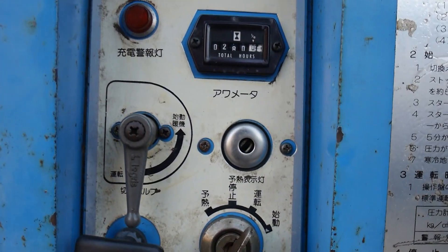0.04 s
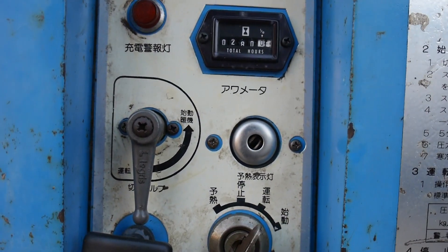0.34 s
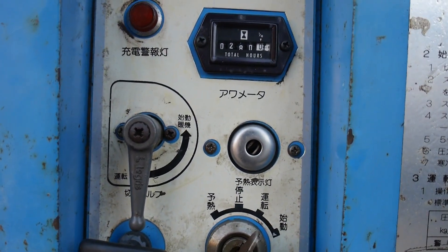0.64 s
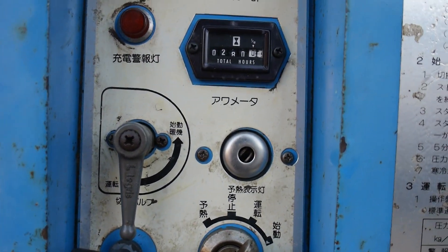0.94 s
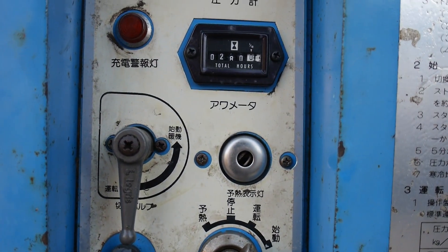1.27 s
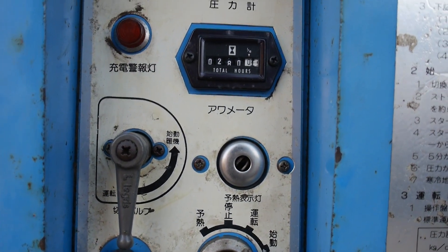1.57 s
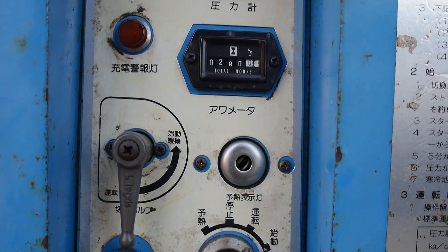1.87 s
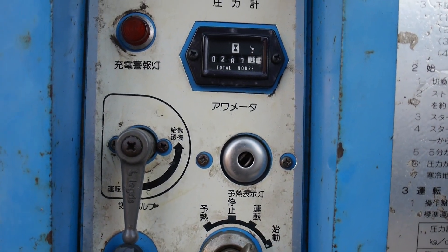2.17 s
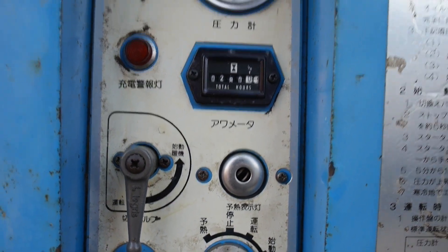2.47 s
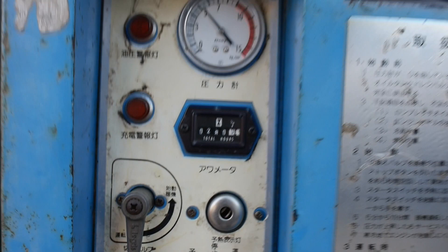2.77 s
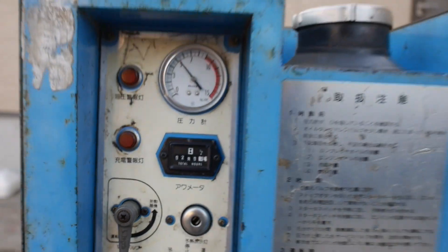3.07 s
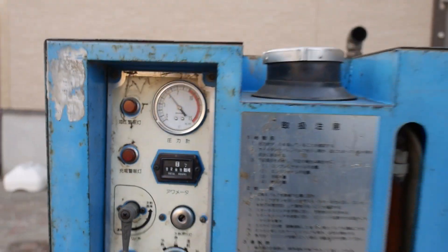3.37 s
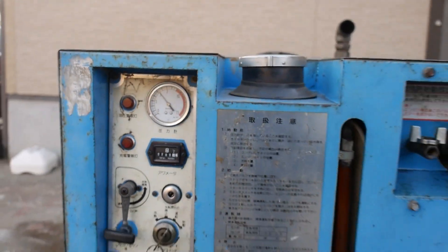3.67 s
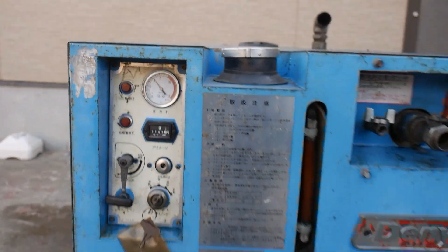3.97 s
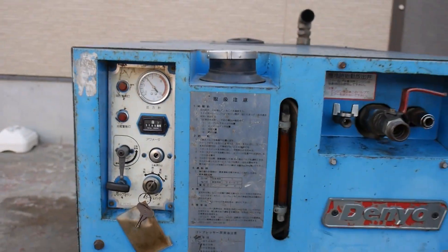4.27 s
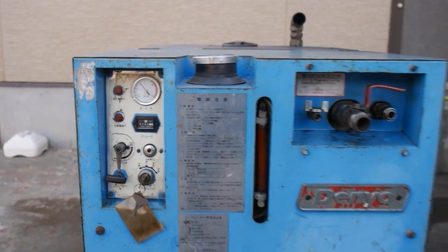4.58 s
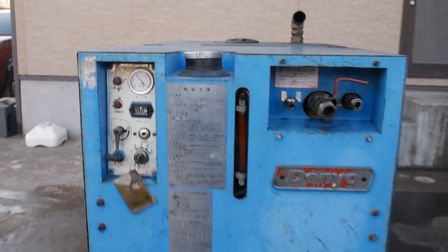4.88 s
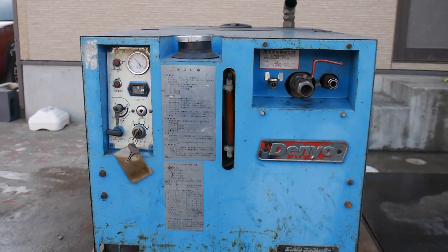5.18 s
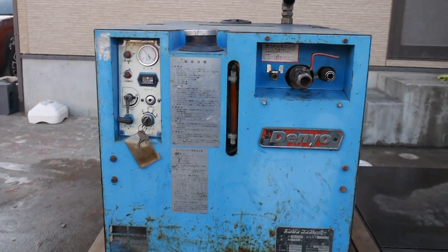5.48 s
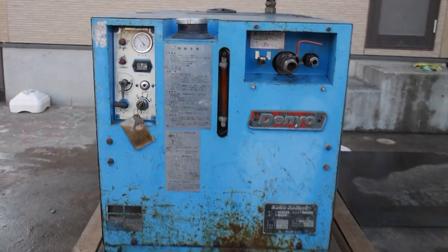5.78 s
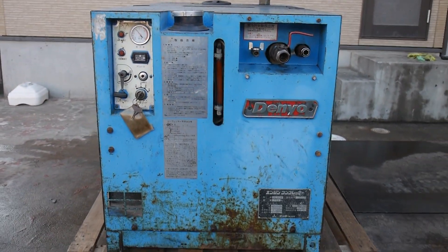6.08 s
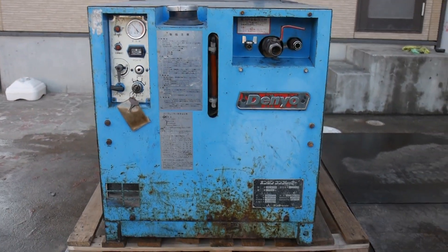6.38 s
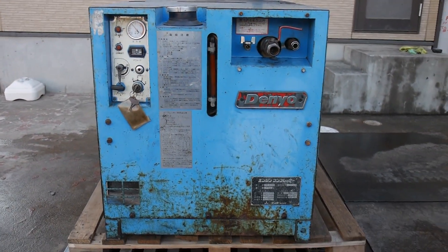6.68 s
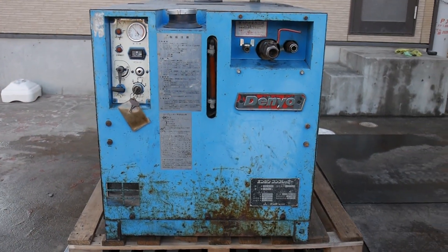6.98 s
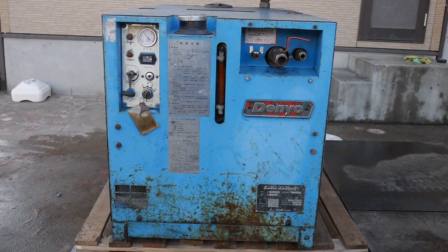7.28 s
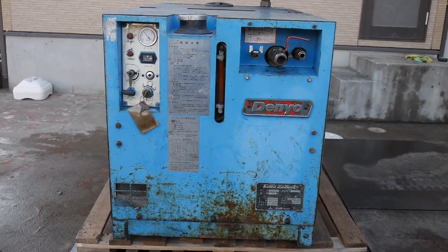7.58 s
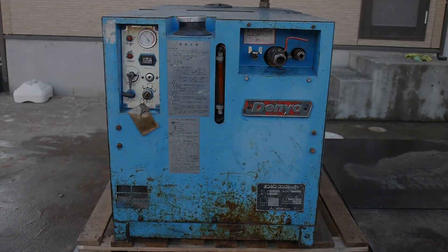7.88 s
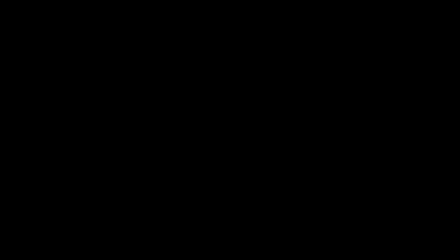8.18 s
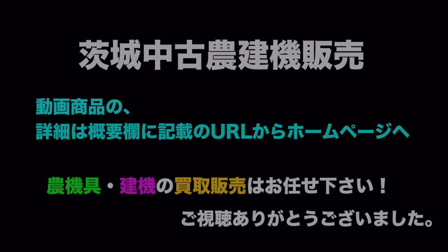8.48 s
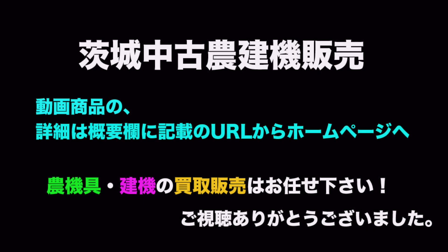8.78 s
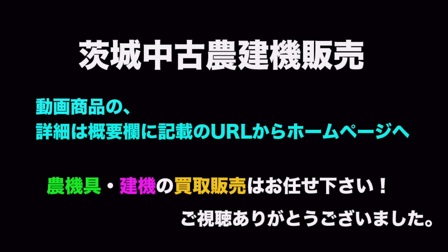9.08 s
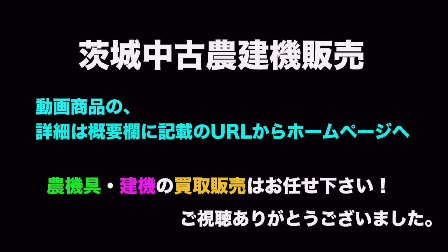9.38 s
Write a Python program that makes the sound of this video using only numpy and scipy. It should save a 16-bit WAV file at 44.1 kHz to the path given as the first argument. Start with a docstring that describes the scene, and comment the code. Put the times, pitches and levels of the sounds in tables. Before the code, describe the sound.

A diesel air compressor idles loudly in an open yard, its steady low drone layered with engine knock, a whine, fast valve clatter and rattling panels. The microphone starts close to the machine, then backs away about a metre and a half, so the tone shifts and a low boom swells. Near the end everything fades smoothly to silence.

```python
"""Diesel air compressor in a yard

A three-cylinder engine idles: exhaust and housing drone on the orders (multiples) of its working cycle,
the block knocks, valves and injectors clatter, loose panels rattle. The hand-held microphone sways at the
control panel, then backs off to about 1.6 m: the colour changes, a boom swells, and the sound fades out."""
import sys
import numpy as np
from scipy.fft import rfft, irfft, next_fast_len
from scipy.io import wavfile
from scipy.ndimage import map_coordinates

SR = 44100
rng = np.random.default_rng(int(sys.argv[2]) if len(sys.argv) > 2 else 0)


def pcm_store(signal):
    """Save signal as 16-bit PCM."""
    levels = np.round(np.clip(np.atleast_2d(signal), -1, 1) * 32767)
    wavfile.write(sys.argv[1], SR, levels.astype(np.int16).T)


N = 420713
TIME = np.arange(N) / SR
AGE = np.arange(SR // 40) / SR  # the life of one blow [s]
CYCLE_HZ = 17.167  # working cycles a second, three firings each
CYCLES = int(N / SR * CYCLE_HZ)
YARD_M = 1.226  # from this distance on, the microphone hears the colour of the open yard
MAIN_ORDERS = (12, 24, 36, 56, 104)  # three booms, rotor whine, drive whine

# microphone path, back from its closest point to the panel: (time [s], distance [m])
MIC_PATH = [(0, 0.18), (.4, 0.31), (1.15, 0.0063), (1.8, 0.23), (2.3, 0.11), (2.8, 0.31), (3.7, 0.77),
            (4.6, 1.1), (5.6, 1.28), (6.5, 1.46), (7.8, 1.57)]
# the microphone's two ports: (frequency [Hz], left minus right [dB], left lead [rad])
MIC_PORTS = [(60, 0, 0), (1700, 0, 0), (2600, -.1, -.03), (3500, -3, -.35), (6700, -2.2, -.25),
             (9300, -1.2, -1.2), (12000, -2, -1.7)]
# the main orders swell and sink on the way through the yard's standing waves: (time [s], level [dB])
BOOM = [(0.0, -37), (0.4, -32.5), (0.8, -34), (1.1, -31.5), (2.3, -35.5), (2.55, -40), (3.25, -39.5),
        (3.8, -32), (4.9, -28), (7.75, -29.5)]
BOOM_OCTAVE = [(0.0, -35.5), (0.55, -34), (0.9, -52), (1.05, -52.5), (1.45, -40), (1.85, -35.5),
               (2.1, -45.5), (2.35, -34.7), (2.85, -46), (3.35, -43), (3.7, -49.5), (3.95, -41.1),
               (4.5, -36), (5.2, -37), (5.45, -47), (6.1, -39.5), (7.75, -40)]
BOOM_TWELFTH = [(0.0, -30), (0.45, -43), (1.2, -31), (1.7, -37), (4.0, -34), (4.35, -40.5), (5.0, -39.0),
                (5.45, -48), (6.5, -35.5), (7.2, -45), (7.75, -41.5)]
ROTOR_WHINE = [(0.0, -35), (0.5, -38.5), (0.95, -36.5), (2.5, -35.5), (4.45, -31), (5.05, -37),
               (5.75, -34.5), (6.75, -38), (7.3, -34.5), (7.75, -35)]
DRIVE_WHINE = [(0, -62), (3.8, -54), (4.9, -46), (5.3, -58), (6.1, -47), (7.4, -45.5), (7.9, -44.5)]
# drone at three microphone spots: (order [rounded in use], panel [dB], midway [dB], yard [dB])
DRONE_ORDERS = [(3, -36.5, -36.5, -35.5), (6, -42, -40, -41), (7, -56.5, -47.5, -43), (8, -43.5, -43, -47),
                (9, -36, -36.5, -43.5), (13, -56, -46.5, -51.5), (15, -45, -47, -39),
                (17, -46.5, -50, -44.5), (21, -43, -45.5, -50), (26, -43.5, -44.5, -49.5),
                (30, -48, -41.5, -43.5), (32, -41, -41, -45), (33, -37.5, -42.5, -45.5),
                (39, -41, -40, -59), (42, -50.5, -44, -49), (44, -44, -42, -46), (45, -54, -41, -43),
                (46, -39, -48.5, -54), (48, -44.5, -52.5, -43.5), (52, -48.5, -42.5, -70.5),
                (53, -43, -45.5, -45.5), (57, -61, -41.5, -50), (60, -38.5, -47.5, -52.5),
                (61, -37, -47.5, -54.5), (62, -48.5, -44.5, -47), (89.2, -53, -60, -52.5),
                (91.3, -59.5, -61, -52), (96.2, -46, -61, -72), (99.1, -49.5, -46, -67)]
# a weaker housing overtone and its reflection:
# (order, level at panel [dB], slope [dB/m], first node [m], node spacing [m], reflected share [0-1])
STANDING_WAVES = [(18, -44, 5.5, 1, 2.9, 0.46)]
# relative colour of block and of valve gear: (frequency [Hz], panel [dB], midway [dB], yard [dB])
BLOCK_COLOUR = [(25.2, -77, -79.5, -77), (79.8, -69.5, -66.5, -69), (130, -66, -70.5, -64),
                (215, -60.5, -59, -57.5), (350, -64.5, -70, -62.5), (453, -57.5, -57.5, -62.5),
                (583, -57.5, -56.5, -57), (801, -57.5, -60, -61.5), (950, -63, -61, -57.5),
                (1094, -57.5, -63, -59.5), (1368, -70.5, -67, -68), (1760, -67, -71, -68),
                (2120, -69.5, -69.5, -68.5), (2526, -72, -72, -70.5), (3268, -86.5, -75.5, -74)]
VALVE_COLOUR = [(3140, -73.5, -86, -92.5), (3870, -78.5, -76, -76.5), (4460, -78, -79.5, -83),
                (5200, -77, -80, -80), (6180, -77.5, -83, -85), (6980, -79, -82, -84),
                (8860, -78, -84.5, -82.5), (9690, -76, -82, -77.5), (11260, -87, -95.5, -92.5),
                (12450, -105, -103, -103)]
# mechanical blows: (place in cycle [0-1], relative level [dB], decay before stretching [s])
BLOWS = [(.19, 3, 0.0037), (.255, -3.5, 0.004), (.33, -2.5, 0.0039), (.53, -3, 0.006), (.615, -4.5, 0.0033),
         (.71, -8.5, .003), (.865, 0, 0.0032), (0.96, 2.5, 0.0028)]
# part of the knock that is alike in every cycle: (frequency [Hz], power share [0-1])
KNOCK_REPEAT = [(100, .65), (400, .55), (900, .58), (1500, .38), (3000, .22)]
# left-right likeness of the clatter: (frequency [Hz], correlation [0-1])
CLATTER_LIKENESS = [(2500, .85), (3300, .7), (4500, .72), (6500, .74), (8500, .7), (12500, .5)]
# rockers and springs:
# (place in cycle [0-1], frequency [Hz], half width [Hz], panel [dB], midway [dB], yard [dB])
VALVE_RINGS = [(.12, 6500, 380, -63.5, -56, -63), (.17, 9390, 302, -56.5, -65, -62),
               (.2, 3500, 792, -62, -58, -57.5), (.52, 5810, 801, -57, -60.5, -57.5),
               (.85, 5820, 800, -58.5, -55, -61), (.855, 8880, 1103, -53.5, -55.5, -57)]
# the three injectors: (place in cycle [0-1], relative level [dB])
INJECTIONS = [(.265, 3.5), (.64, 3), (.935, 3.5)]
# fuel line resonances: (frequency [Hz], half width [Hz], panel [dB], midway [dB], yard [dB])
FUEL_LINES = [(6010, 300, -55, -55, -55.5), (6790, 150, -54.5, -60.5, -60.5), (8900, 370, -51, -62.5, -62),
              (9600, 400, -59.5, -60, -58.5)]
# one more of them, flaring twice as the microphone backs away: (time [s], level [dB])
FUEL_SIZZLE = [(0, -61), (3.85, -57.5), (4.15, -51.5), (4.47, -58), (4.75, -53), (5, -57.5)]
# a steel part under the valve blows: (frequency [Hz], relative level [dB], decay [s])
CLINK_MODES = [(2542, -1, .007), (2676, -0.5, .007), (2910, -0.5, 0.0027), (3155, -2.5, 0.0021)]
# the blows that reach it: (place in cycle [0-1], relative level [dB])
CLINK_BLOWS = [(.195, 2), (0.251, -1), (.55, -6.5), (.89, -7)]
# loose panels, from the closest spot: (place in cycle [0-1], frequency [Hz], level [dB])
PANEL_KNOCKS = [(.17, 1835, -48), (.52, 2085, -50.5), (.92, 1750, -49.5)]
# single harder hits on steel: (time [s], frequency [Hz], level [dB])
HARD_TICKS = [(.54, 9000, -30), (.714, 8450, -30), (2.684, 6650, -33), (3.207, 6300, -35),
              (3.212, 8300, -32), (4.207, 8200, -34), (4.79, 8300, -38)]


def boom_and_whine(cycle):
    """The housing booms on three orders; the rotor holds a clean whine, the drive a thinner one."""
    levels = [BOOM, BOOM_OCTAVE, BOOM_TWELFTH, ROTOR_WHINE, DRIVE_WHINE]
    return sum(amp(over_time(level)) * order_tone(order, cycle, waver_db=0.5, slip=.018)
               for order, level in zip(MAIN_ORDERS, levels))


def drone(cycle, shares):
    """Firing pulses and housing panels sound on whole orders of the cycle."""
    return sum((amp(dbs) @ shares) * order_tone(round(order), cycle) for order, *dbs in DRONE_ORDERS)


def block_knock(cycle, shares, metres):
    """Combustion and piston blows shake the block: partly alike in every cycle, partly new."""
    weights = np.array([wobble(0.701) for _ in range(3)])  # the mix of weak orders drifts slowly
    weak_orders = sum(w * block_vibration(cycle) for w in weights) / np.linalg.norm(weights, axis=0)
    same = filtered(weak_orders, lambda hz: np.sqrt(over_hz(KNOCK_REPEAT, hz)))
    noise = np.sqrt(5) * rng.standard_normal(N)  # wider in band than the orders, so driven harder
    fresh = filtered(noise, lambda hz: np.sqrt(1 - over_hz(KNOCK_REPEAT, hz)))
    struck = 0.16 / (1 + metres / YARD_M)  # the yard's echoes smooth the blows
    force = np.sqrt(1 - struck + struck * blow_power(cycle, scatter_db=0.5, attack=.0005, stretch=0.64))
    throb_db = 0.5 * (1 - shares[2]) * np.cos(2 * np.pi * (3 * cycle - 0.044))  # each firing, close up
    level_db = -28 - 2.5 * np.minimum(metres, YARD_M)
    body = amp(level_db) * coloured((same + fresh) * force * amp(throb_db), BLOCK_COLOUR, shares)
    low_mids = filtered(body, lambda hz: bell(hz, 330, 56))
    return body - 0.56 * bell(metres, 1.27, .15) * low_mids  # a hollow spot 1.27 m back


def block_vibration(cycle, size=4096):
    """The block shakes alike in every cycle on the weak orders between the strong ones."""
    spectrum = np.exp(2j * np.pi * rng.random(size // 2 + 1))
    strong = [*MAIN_ORDERS] + [round(row[0]) for row in [*DRONE_ORDERS, *STANDING_WAVES]]
    spectrum[[0, *strong]] = 0
    spectrum[size // 16:] = 0
    return unit(np.interp(cycle % 1 * size, np.arange(size), irfft(spectrum), period=size))


def standing_wave(cycle, metres):
    """A housing overtone meets its own reflection and sinks as the microphone passes a node."""
    out = np.zeros(N)
    for order, db, db_per_m, node, spacing, reflected in STANDING_WAVES:
        phase = 2 * np.pi * (metres - node) / spacing
        pattern = np.sqrt(1 + reflected ** 2 - 2 * reflected * np.cos(phase))
        out += amp(db + db_per_m * metres) * pattern * order_tone(round(order), cycle)
    return out


def valve_clatter(cycle, shares, struck=0.51, grit_db=2):
    """Valves and injectors tick over the hiss of the cooling air, partly different left and right."""
    power = blow_power(cycle, scatter_db=4.0, attack=.0004, stretch=1.7)
    ticks = unit(np.sqrt(power) * amp(grit_db * wobble(600)))
    noise = rng.standard_normal((2, N)) * np.sqrt(1 - struck + struck * ticks ** 2)
    spread = lambda hz: np.arccos(over_hz(CLATTER_LIKENESS, hz)) / 2
    mid, side = filtered(noise, lambda hz: np.array([np.cos(spread(hz)), np.sin(spread(hz))]))
    level = amp([-41, -41.5, -44.5]) @ shares  # panel, midway, yard
    return level * coloured(np.array([mid + side, mid - side]), VALVE_COLOUR, shares)


def valve_rings(cycle, shares):
    """Rockers and springs each chatter briefly in their own resonance when their blow falls."""
    return sum((amp(dbs) @ shares) * struck_part(cycle, place, hz, width)
               for place, hz, width, *dbs in VALVE_RINGS)


def injectors(cycle, shares):
    """Each injection rings all the resonances of the fuel lines."""
    def pipe(hz, width):
        return unit(sum(amp(db) * struck_part(cycle, place, hz, width) for place, db in INJECTIONS))
    sizzle = amp(over_time(FUEL_SIZZLE)) * pipe(hz=8200, width=270)
    return sizzle + sum((amp(dbs) @ shares) * pipe(hz, width) for hz, width, *dbs in FUEL_LINES)


def clink(cycle, metres, attack=0.00034, scatter_db=2, detune=0.007, slip=.13):
    """Valve blows ring a few steel modes, a little different in strength and pitch each time."""
    out = np.zeros(N)
    chance = lambda: rng.standard_normal((CYCLES, 1))
    for place, blow_db in CLINK_BLOWS:
        detuned_age = AGE * (1 + detune * chance())
        ring = 0
        for hz, db, decay in CLINK_MODES:
            envelope = amp(db + scatter_db * chance()) * np.exp(-AGE / decay)
            ring += envelope * sine(hz * detuned_age + rng.random() + slip * chance())
        out += amp(blow_db) * each_cycle(cycle, place, ring * (1 - np.exp(-AGE / attack)), jitter_s=0)
    gap_db = 4.1 * bell(metres, 0.53, 0.18)  # loudest with the microphone in line with a gap
    return amp(-45.5 - 3.5 * metres + gap_db) * unit(out)


def loose_panels(cycle, metres, db_per_m=-2.5):
    """Loose panels give short ringing knocks, now hard, now hardly at all."""
    knocks = sum(amp(db) * struck_part(cycle, place, hz, width=290, scatter_db=5.0)
                 for place, hz, db in PANEL_KNOCKS)
    return amp(db_per_m * metres) * knocks


def hard_ticks():
    """Now and then a steel part is hit harder and stands out."""
    out = np.zeros(N)
    for start, hz, db in HARD_TICKS:
        out[round(start * SR):][:len(AGE)] += amp(db) * chatter(hz, width=250, count=1)[0]
    return out


def crank(drift=0.0006, flutter=0.0009):
    """Working cycles elapsed; the governor holds the speed almost steady."""
    return np.cumsum(CYCLE_HZ * (1 + drift * wobble(1.5) + flutter * wobble(20))) / SR


def order_tone(order, cycle, waver_db=1.15, slip=0.046):
    """One order of the cycle; level and phase waver more with pitch, up to 500 Hz."""
    unsteady = min(order * CYCLE_HZ / 500, 1)
    lag = order ** 2 / 10.4  # silencer and housing delay each order differently, smearing the pulses
    level = amp(unsteady * waver_db * wobble(9))
    return level * sine(order * cycle - lag + unsteady * slip * wobble(12))


def blow_power(cycle, scatter_db, attack, stretch):
    """Power of the blows that recur in each cycle, each time with a new force; mean 1."""
    power = np.zeros(N)
    for place, db, decay in BLOWS:
        force = amp(db + scatter_db * rng.uniform(-1.1, 1, (CYCLES, 1)))
        envelope = (1 - np.exp(-AGE / attack)) * np.exp(-AGE / (decay * stretch))
        power += each_cycle(cycle, place, (force * envelope) ** 2)
    return power / power.mean()


def struck_part(cycle, place, hz, width, scatter_db=3.0):
    """A resonance struck once a cycle, each time with a new force; rms 1."""
    force = amp(scatter_db * rng.uniform(-2.16, 1, (CYCLES, 1)))
    return unit(each_cycle(cycle, place, force * chatter(hz, width, count=CYCLES)))


def chatter(hz, width, count, attack=0.00096, decay=0.006):
    """Short noise bursts (rows) in one steel resonance."""
    resonance = bell(np.fft.rfftfreq(len(AGE), 1 / SR), hz, width)
    noise = unit(irfft(rfft(rng.standard_normal((count, len(AGE)))) * resonance, len(AGE)))
    return noise * (1 - np.exp(-AGE / attack)) * np.exp(-AGE / decay)


def each_cycle(cycle, place, shapes, jitter_s=.0003):
    """Lay one shape (a row) into every cycle at this place, slightly early or late."""
    starts = np.interp(np.arange(CYCLES) + place, cycle, TIME) + jitter_s * rng.standard_normal(CYCLES)
    index = np.abs(starts * SR).astype(int)[:, None] + np.arange(len(AGE))
    return np.bincount(index.ravel(), shapes.ravel(), N)[:N]


def mic_shares(metres):
    """Shares (3 x N) of the sound heard at the panel, midway and in the yard."""
    way_out = np.clip(metres / YARD_M, 0, 1) ** 1.9  # the panel's colour holds at first
    return np.clip(1 - np.abs(2 * way_out - np.arange(3)[:, None]), 0, 1)


def mic_ports(hz):
    """Level and phase at the left and right port, half of the difference on each side."""
    f, db, lead = np.transpose(MIC_PORTS)
    half = np.array([[.5], [-.5]])
    return amp(half * over_hz(np.c_[f, db], hz)) * np.exp(1j * half * over_hz(np.c_[f, lead], hz))


def coloured(x, table, shares):
    """Give x the colour heard at each microphone spot; the band ends steeply at the table's edges."""
    f, *spots = np.transpose(table)
    edges = lambda hz: 1 / np.sqrt((1 + (hz / f[-1]) ** 16) * (1 + (f[0] / (hz + 1)) ** 16))
    return sum(share * unit(filtered(x, lambda hz: edges(hz) * amp(over_hz(np.c_[f, db], hz))))
               for share, db in zip(shares, spots))


def filtered(x, response):
    """x through a response of frequency."""
    size = next_fast_len(N + 8192, True)
    return irfft(rfft(x, size) * response(np.fft.rfftfreq(size, 1 / SR)), size)[..., :N]


def wobble(rate):
    """A smooth random curve, rate knots a second."""
    coarse = TIME[::64]
    knots = rng.standard_normal(int(TIME[-1] * rate) + 4)
    return np.interp(TIME, coarse, map_coordinates(knots, [coarse * rate]))


def over_hz(points, hz):
    """(frequency, value) points read on a log axis."""
    f, values = np.transpose(points)
    return np.interp(np.log(hz + 1), np.log(f + 1), values)


def over_time(points):
    """(time, value) points read at every sample."""
    return np.interp(TIME, *np.transpose(points))


def sine(turns):
    """A sine of rms 1."""
    return np.sqrt(2) * np.sin(2 * np.pi * turns)


def bell(x, centre, half_width):
    """A smooth bump of height 1."""
    return np.exp(-((x - centre) / half_width) ** 2)


def amp(db):
    """Decibels to gain."""
    return 10 ** (np.asarray(db) / 20)


def unit(x):
    """Scale to rms 1."""
    return x / np.sqrt(np.mean(x ** 2) + 1e-20)


def scene():
    """One crankshaft times the machine; the microphone's distance shapes levels and colours."""
    cycle, metres = crank(), over_time(MIC_PATH)
    shares = mic_shares(metres)
    tones = drone(cycle, shares) + standing_wave(cycle, metres) + boom_and_whine(cycle)
    steel = valve_clatter(cycle, shares) + valve_rings(cycle, shares) + injectors(cycle, shares)
    steel += clink(cycle, metres) + hard_ticks()
    steel *= amp(1.4 * bell(TIME, 6.45, 0.6))  # the treble swells slightly, once
    knocks = block_knock(cycle, shares, metres) + loose_panels(cycle, metres)
    return filtered(tones + knocks + steel, mic_ports)


def record(dry):
    """A smooth fade to silence, three narrow notches in the treble, then the band limit."""
    fade_start_s, fade_end_s = 7.705, 8.756
    notches_hz, half_width_hz, top_hz = (3975, 4640, 5540), 22, 14500
    progress = np.clip((TIME - fade_start_s) / (fade_end_s - fade_start_s), 0, 1)
    fade = np.cos(np.pi / 2 * progress) ** 2
    notches = lambda hz: np.prod([(hz - f) / (hz - f - 1j * half_width_hz) for f in notches_hz], axis=0)
    return filtered(dry * fade, lambda hz: notches(hz) * (hz < top_hz))


dry = scene()
out = record(dry)
pcm_store(out)
```